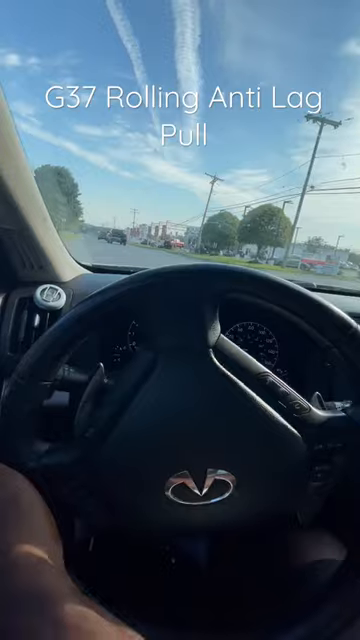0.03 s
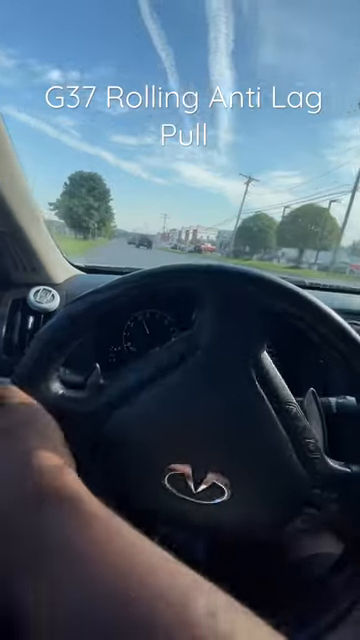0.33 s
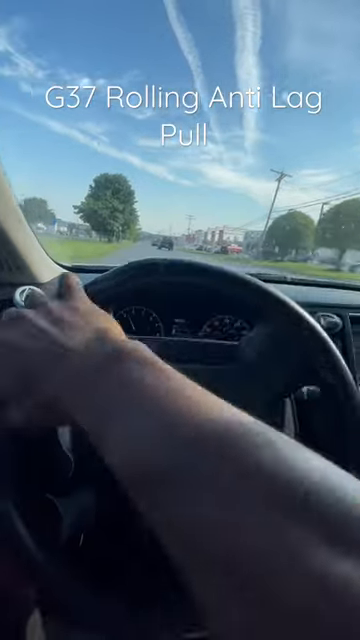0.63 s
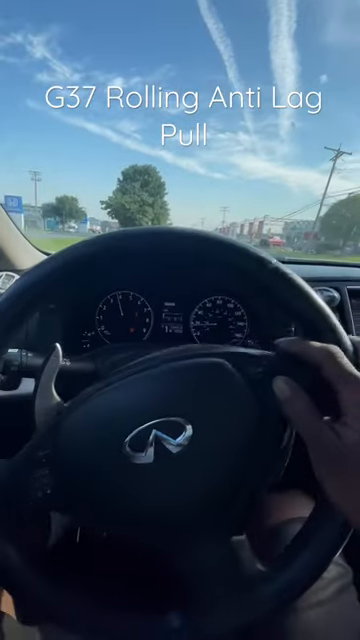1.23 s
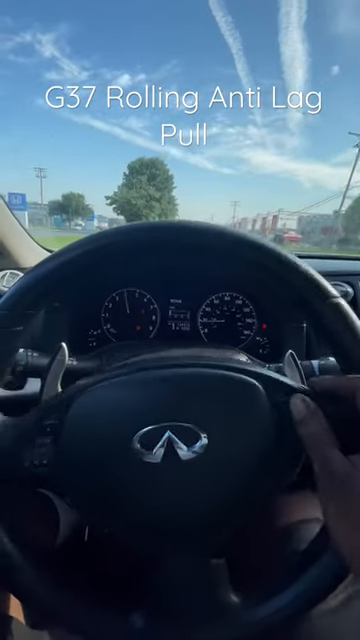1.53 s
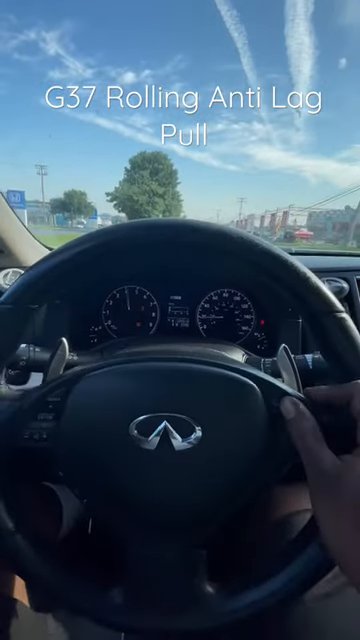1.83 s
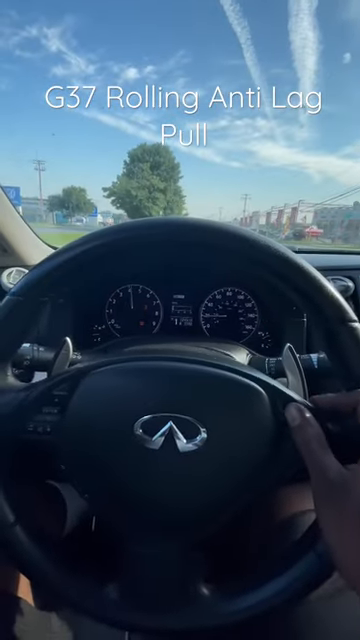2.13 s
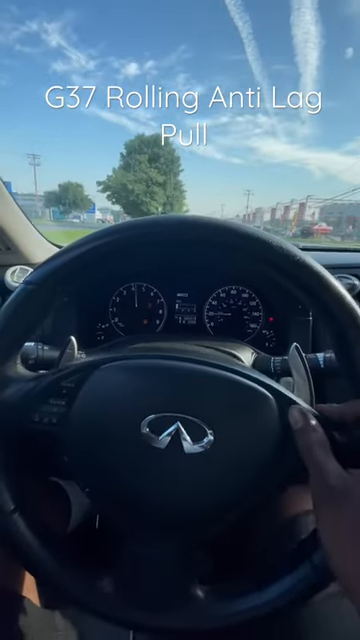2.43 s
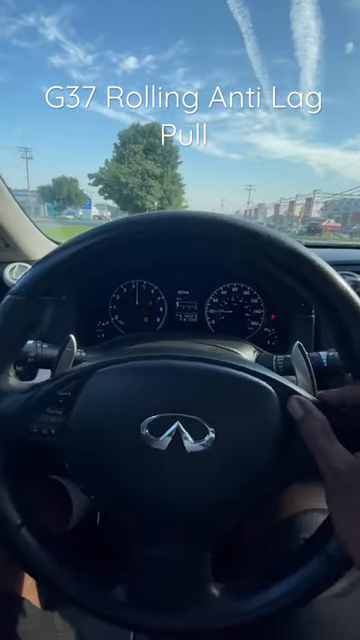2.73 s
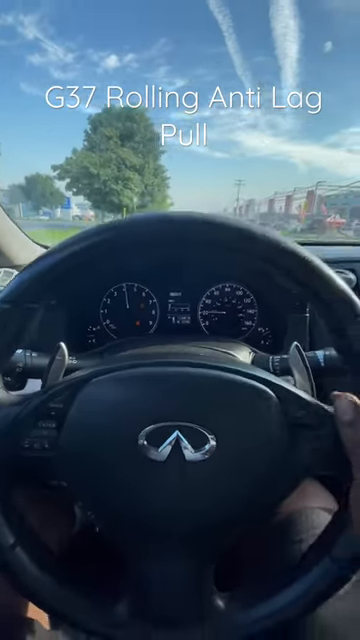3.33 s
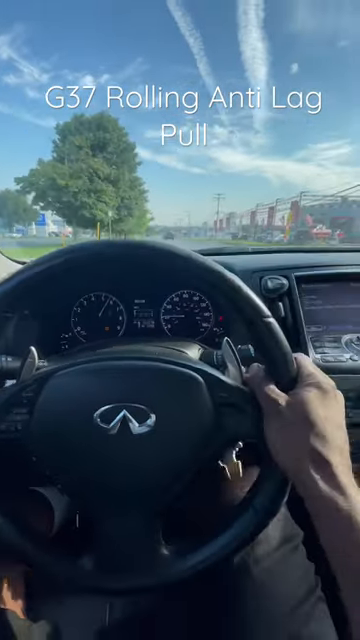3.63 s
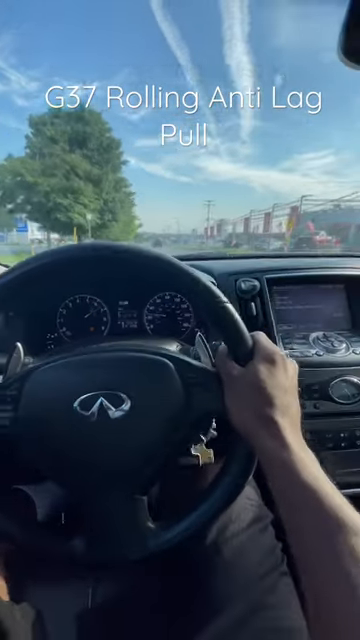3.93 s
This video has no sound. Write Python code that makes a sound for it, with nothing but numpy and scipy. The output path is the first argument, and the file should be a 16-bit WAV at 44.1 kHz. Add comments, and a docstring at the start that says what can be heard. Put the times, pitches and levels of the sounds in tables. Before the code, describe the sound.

Car engine climbing in the cabin, with exhaust bangs, a hissing drone and brief squeals.

```python
"""Inside a moving car with a six-cylinder engine. The revs climb gently; the exhaust bangs a few times,
the engine is held steady in a rough, hissing drone, then let go: the revs leap and five short squeals
follow. The engine note is a stack of multiples of its cycle, coloured by pipe and cabin, and the exhaust
rasp pulses with its firings. Hands rub on the steering wheel; road rumble lies underneath."""
import sys
import numpy as np
from scipy import signal
from scipy.io import wavfile
from scipy.ndimage import uniform_filter1d, minimum_filter1d

SR = 44100
rng = np.random.default_rng(int(sys.argv[2]) if len(sys.argv) > 2 else 0)


def bounce(signal):
    """Save signal as a 16-bit WAV file at the path given by the first command-line argument."""
    frames = np.transpose(np.atleast_2d(signal))
    limited = np.clip(frames, -1, 1)
    pcm = np.round(limited * 32767).astype(np.int16)
    wavfile.write(sys.argv[1], SR, pcm)


N = 176400
T = np.arange(N) / SR


def from_db(db):
    """Decibels to gain."""
    return 10 ** (np.asarray(db) / 20)


def unit_rms(x):
    """Scale to unit power."""
    return x / np.sqrt(np.mean(x ** 2) + 1e-20)


def envelope(rows, column=1):
    """One column of a breakpoint curve at every sample."""
    rows = np.array(rows)
    return np.interp(T, rows[:, 0], rows[:, column])


def at_hz(rows, hz, column=1):
    """One column of a spectrum, read on a log-frequency axis."""
    rows = np.array(rows)
    return np.interp(np.log(hz), np.log(rows[:, 0]), rows[:, column])


def drift(rate_hz):
    """Smooth random modulation of spread 1, made at a twentieth of the sample rate."""
    pole = np.exp(-40 * np.pi * rate_hz / SR)
    slow = signal.lfilter([1], [1, -2 * pole, pole * pole], rng.standard_normal(N // 20 + 2002))[2000:]
    return np.interp(np.arange(N) / 20, np.arange(len(slow)), unit_rms(slow))


# Stereo image of the noise: f/Hz, left-right correlation
NOISE_IMAGE = [(60, 1), (250, .95), (600, 0.7), (1800, 0.8), (8000, -.2), (12000, 0)]
def noise_bands():
    """Stereo noise in narrow bands of equal density, as (centre Hz, band) pairs."""
    edges = np.geomspace(18, 16000, 27)
    white = rng.standard_normal((2, 2, N + SR // 2))
    bands = []
    for k, (low, high) in enumerate(zip(edges, edges[1:])):
        bandpass = signal.butter(2, [low, high], "band", fs=SR, output="sos")
        mid, side = signal.sosfilt(bandpass, white[k % 2])[:, -N:]
        hz = np.sqrt(low * high)
        alike = at_hz(NOISE_IMAGE, hz)
        bands.append((hz, np.sqrt(1 + alike) * mid + np.sqrt(1 - alike) * side * [[1], [-1]]))
    return bands


def coloured(bands, eq):
    """Mix the bands through an EQ curve, at unit power."""
    return unit_rms(sum(from_db(at_hz(eq, hz)) * band for hz, band in bands))


def narrow_noise(hz, width_hz, db):
    """One band of noise, near the centre of the image."""
    bandpass = signal.butter(2, [hz - width_hz / 2, hz + width_hz / 2], "band", fs=SR, output="sos")
    white = rng.standard_normal(N) + .5 * rng.standard_normal((2, N))
    return from_db(db) * unit_rms(signal.sosfilt(bandpass, white))


# Firing rate, six firings to an engine cycle: t/s, f/Hz
FIRING_RATE = [(0, 160.8), (0.2, 164.7), (0.5, 173.7), (1, 187.7), (1.5, 199.4), (2, 210.5), (2.5, 218.3),
               (2.73, 225.8), (2.9, 209.9), (3, 205.6), (3.1, 209.3), (3.32, 207.4), (3.4, 265.2),
               (3.5, 285.1), (3.62, 306), (3.8, 318), (4, 329)]
def revs():
    """The engine cycle that drives tone and rasp: its phase in radians and its rate in Hz."""
    cycle_hz = envelope(FIRING_RATE) / 6
    return 2 * np.pi * np.cumsum(cycle_hz) / SR, cycle_hz


# The cabin's standing waves: f/Hz, left minus right level/dB, left lead/rad
STANDING_WAVES = [(100, 0.5, 0), (383, 2, 0.3), (366, -9, 1.5), (429, 8.5, 0.58), (517, -1.5, -1.5),
                  (617, 15, -0.3), (653, -6, 2), (870, 4, 0.64)]
def cabin_pan(wave, hz):
    """Standing waves give an engine partial a different level and phase on each side."""
    balance = from_db(at_hz(STANDING_WAVES, hz))
    lead = at_hz(STANDING_WAVES, hz, column=2)
    left, right = balance * wave.real, (wave * np.exp(-1j * lead)).real
    return np.array([left, right]) / np.sqrt(1 + balance ** 2)


# Strong orders (multiples of the cycle) sweeping through pipe and cabin resonances: t/s, level/dB
ORDER_3_LEVEL = [(0, -29), (2.6, -35.5), (3.1, -29), (3.5, -19.5), (4, -20.5)]
ORDER_4_LEVEL = [(0, -27.5), (.7, -31.5), (1.86, -19.5), (2.78, -14.5), (2.89, -19), (3.39, -35),
                 (3.63, -23.5), (4, -31)]
ORDER_5_LEVEL = [(0.0, -24), (0.65, -17.5), (0.82, -11.5), (1.53, -21), (1.85, -25.5), (1.99, -21.5),
                 (2.74, -23), (2.83, -4), (3.23, -57), (3.34, -20), (3.55, -45), (3.99, -29.5)]
FIRING_NOTE_LEVEL = [(0.0, -14), (0.35, -12.5), (0.45, -6.5), (0.62, -5.5), (0.77, -12), (1.43, -10),
                     (1.84, -14.5), (2.73, -14.5), (2.78, -13), (2.95, -2.5), (3.12, -6.5), (3.31, -8),
                     (3.4, -15), (3.52, -9.5), (3.58, -32), (3.63, -16.5), (3.71, -12), (3.99, -15.5)]
ORDER_12_LEVEL = [(0, -25), (.659, -19), (.919, -28.5), (1.13, -26.5), (1.27, -38), (1.5, -26.5),
                  (1.74, -43), (2.75, -34.5), (2.97, -20.5), (3.32, -23.5), (3.39, -29.5), (3.49, -22.5),
                  (3.63, -18.5), (3.99, -33.5)]
ORDER_18_LEVEL = [(0.0, -56), (0.25, -45), (0.37, -28), (0.56, -29.5), (0.789, -23.5), (2.22, -34.5),
                  (2.51, -29.5), (2.75, -42), (2.94, -16), (3.29, -18.5), (3.37, -32), (3.99, -42)]
ORDER_24_LEVEL = [(.1, -27), (.28, -41.5), (.48, -26.5), (.61, -35), (.85, -31), (1, -49), (1.33, -35),
                  (2.6, -42), (3.3, -39), (4, -45)]
ORDER_30_LEVEL = [(.75, -49), (.96, -34.5), (1.2, -43.5), (2.5, -58), (3, -34.5), (4, -66.5)]
# Chug, the weak orders from unequal cylinders: order, level/dB
CHUG_ORDERS = [(2, -30), (7, -23), (8, -30.5), (9, -27.5), (10, -34), (11, -37.5), (13, -34.5), (15, -40),
               (16, -49.5), (17, -42), (19, -42.5), (21, -47.5), (22, -46), (23, -47.5), (25, -51),
               (29, -52)]
# Exhaust and cabin colour on the chug: f/Hz, gain/dB
CHUG_EQ = [(70, -2.5), (105, 8.5), (189, -4), (325, -16.5), (369, -1), (439, -10.5), (466, 6), (508, 0),
           (576, 11), (611, 2), (700, -4.5), (751, -10), (834, 9.5), (905, 0), (941, 10.5), (1067, -6.5)]
# Engine effort: t/s, chug gain/dB, roughness/0-1
ENGINE_EFFORT = [(0, 1.5, 0), (2.72, 0, 0.13), (2.8, -11, 0.51), (2.95, 11, 0.35), (3.3, -4, 0.03),
                 (3.45, -5.5, 0.17), (4, -12.5, .04)]
def engine(cycle, cycle_hz):
    """Low orders beat into a throb, weak ones chug once a cycle, and uneven combustion shakes them all."""
    shake_hz = 31
    effort_db, roughness = envelope(ENGINE_EFFORT), envelope(ENGINE_EFFORT, column=2)
    cycle = cycle + .13 * roughness * drift(shake_hz)  # timing jitter

    def partial(order, db, shake=1, phase=0):
        wobble = shake * roughness * (drift(shake_hz) + 1j * drift(shake_hz)) / 2
        wave = np.exp(1j * (order * cycle + phase)) * (1 + wobble)
        return 2 * from_db(db) * cabin_pan(wave, order * cycle_hz)

    out = partial(6, envelope(FIRING_NOTE_LEVEL), shake=.82)
    for order, level in (3, ORDER_3_LEVEL), (4, ORDER_4_LEVEL), (5, ORDER_5_LEVEL):
        out += partial(order, envelope(level))
    overtones = (12, ORDER_12_LEVEL), (18, ORDER_18_LEVEL), (24, ORDER_24_LEVEL), (30, ORDER_30_LEVEL)
    for order, level in overtones:
        out -= partial(order, envelope(level))  # polarity flipped against the firing note
    for order, db in CHUG_ORDERS:
        level = db + effort_db + at_hz(CHUG_EQ, order * cycle_hz)
        out += partial(order, level, shake=3.6, phase=rng.normal(0, 2.34))
    return out


# Exhaust bang cues: t/s, boom level/dB, crack level/dB
BANG_CUES = [(2.764, -6, -18), (2.784, -16, -20), (2.801, -12, -6), (2.821, -24, -5), (2.841, -4, 2.5),
             (2.867, -5.5, -29), (2.981, -16.5, -12.5), (3.016, -10.5, -18)]
# Low modes that each bang sets ringing: f/Hz, level/dB, t60/s
BOOM_MODES = [(83.01, -1, .2), (131.9, 11.5, 0.17)]
# Tone of the crack: f/Hz, level/dB
CRACK_EQ = [(100, 5), (350, 6), (650, -2), (950, -20), (2100, -26), (3500, -44), (13000, -38)]
def exhaust_bangs(bands, attack_s=.002, crack_decay_s=.008):
    """Each bang is a low ringing boom with a short noise crack on top."""
    boom, crack = np.zeros(N), np.zeros(N)
    for start, boom_db, crack_db in BANG_CUES:
        age = np.maximum(T - start, 0)
        attack = 1 - np.exp(-age / attack_s)
        crack += from_db(crack_db) * 2 * attack * np.exp(-age / crack_decay_s)
        for hz, db, t60 in BOOM_MODES:
            boom += attack * from_db(boom_db + db - 60 * age / t60) * np.sin(2 * np.pi * hz * age)
    return boom + crack * coloured(bands, CRACK_EQ)


# Fader ride of the exhaust rasp: t/s, level/dB
RASP_FADER = [(.8, -30), (1.6, -30.5), (2.72, -36.5), (2.8, -28), (2.89, -44), (2.97, -20), (3.3, -20.5),
              (3.4, -29), (3.6, -27), (4, -25)]
# Tone of the rasp: f/Hz, level/dB
RASP_EQ = [(60, -13.5), (125, 9.5), (250, -6), (480, -2.5), (640, -6), (800, -6), (1050, -13.5),
           (1350, -22.5), (1800, -21), (2400, -28), (8000, -52.5)]
def exhaust_rasp(bands, cycle, flicker_db=1.3):
    """Gas noise that swells with each firing and once a cycle."""
    pulse = unit_rms((1 + .55 * np.cos(6 * cycle)) * (1 + .21 * np.cos(cycle)))
    return from_db(envelope(RASP_FADER) + flicker_db * drift(38)) * pulse * coloured(bands, RASP_EQ)


# Squeal cues: peak t/s, half-length/s, f/Hz, level/dB
SQUEAL_CUES = [(3.486, 0.049, 3080, -30), (3.574, 0.058, 3050, -33), (3.667, 0.038, 2888, -27.5),
               (3.765, 0.039, 2970, -33), (3.858, 0.039, 3110, -42)]
# Partials of a squeal: frequency ratio, level/dB, width/Hz
SQUEAL_TIMBRE = [(.5, -2.5, 180), (0.999, -4, 110), (1.08, -9, 280)]
def squeals():
    """Wavering tones, likely the tyres slipping, that swell and fade about eleven times a second."""
    out = np.zeros((2, N))
    for ratio, partial_db, width_hz in SQUEAL_TIMBRE:
        shared = drift(width_hz) + 1j * drift(width_hz)
        waver = np.array([shared + .69 * (drift(width_hz) + 1j * drift(width_hz)) for _ in range(2)])
        for peak, half_length, hz, db in SQUEAL_CUES:
            near = np.abs(T - peak) < half_length
            swell = np.cos(np.pi / 2 * (T[near] - peak) / half_length) ** 2
            tone = (waver[:, near] * np.exp(2j * np.pi * hz * ratio * T[near])).real
            out[:, near] += from_db(db + partial_db) * swell * tone
    return out * from_db([[.8], [-.8]])  # a touch left


# Fader ride of the intake hiss: t/s, level/dB
HISS_FADER = [(.6, -56), (.85, -54), (1.6, -60.5), (2.2, -55.5), (2.72, -51.5), (2.89, -48), (2.97, -37.5),
              (3.15, -42), (3.43, -44), (4, -47.5)]
# Tone of the hiss: f/Hz, level/dB
HISS_EQ = [(1000, -3.5), (2400, 6), (4200, -0.5), (6300, 3.5), (8200, -1.5), (11000, -25), (15000, -14)]
# Peaks in the hiss; the highest is a thin band of top treble: f/Hz, width/Hz, relative level/dB
HISS_PEAK_BANDS = [(1800, 200, -0.5), (6140, 1200, -8.5), (11460, 1100, -9.5)]
def intake_hiss(bands):
    """Rushing intake air, with a few narrow peaks in the hiss and a thin steady whine."""
    rush = coloured(bands, HISS_EQ) + sum(narrow_noise(*peak) for peak in HISS_PEAK_BANDS)
    hiss = from_db(envelope(HISS_FADER) + drift(21)) * rush
    whine = narrow_noise(hz=2400, width_hz=73, db=-62)
    return hiss + whine


# Squeaks, rubs and ticks on the wheel: peak t/s, 1/e half-length/s, f/Hz, width/Hz, level/dB
HAND_CUES = [(.087, 0.0049, 5810, 300, -45.5), (.755, 0.027, 5850, 300, -58),
             (.77, 0.077, 1650, 608, -52.5), (.918, .003, 11500, 2500, -51)]
def hands_on_wheel():
    """Brief swells of friction as the steering wheel is turned."""
    return sum(np.exp(-((T - peak) / half_length) ** 2) * narrow_noise(*band)
               for peak, half_length, *band in HAND_CUES)


# Fader ride of the road rumble: t/s, level/dB
ROAD_FADER = [(.65, -28), (1.1, -27), (1.9, -23.5), (2.4, -23), (2.85, -18.5), (4, -26)]
# Tone of the rumble: f/Hz, level/dB
ROAD_EQ = [(20, -13), (70, 4.5), (200, -4), (400, -13.5), (900, -30.5), (4000, -54)]
def road_rumble(bands):
    """A dark bed of road noise whose level wanders slightly."""
    return from_db(envelope(ROAD_FADER) + drift(4.4)) * coloured(bands, ROAD_EQ)


def scene():
    """Engine, exhaust, intake and road as heard from the driver's seat."""
    cycle, cycle_hz = revs()
    gas, air = noise_bands(), noise_bands()
    low_end = road_rumble(air) + exhaust_rasp(gas, cycle) + exhaust_bangs(air)
    low_end *= from_db([[.7], [-.7]])  # a touch left
    return engine(cycle, cycle_hz) + low_end + intake_hiss(air) + squeals() + hands_on_wheel()


def record(dry):
    """Master chain: a quick fade-in, a fast peak limiter and a steep high cut."""
    start_s, fade_s, ceiling, cutoff_hz = .035, .002, .86, 14600
    faded = dry * np.clip((T - start_s) / fade_s, 0, 1)
    needed_gain = np.minimum(1, ceiling / (np.abs(faded).max(axis=0) + 1e-9))
    held_gain = minimum_filter1d(needed_gain, size=300)
    smooth_gain = uniform_filter1d(uniform_filter1d(held_gain, size=150), size=150)
    high_cut = signal.cheby2(12, 60, cutoff_hz, fs=SR, output="sos")
    return signal.sosfilt(high_cut, faded * smooth_gain)


dry = scene()
out = record(dry)
bounce(out)
```